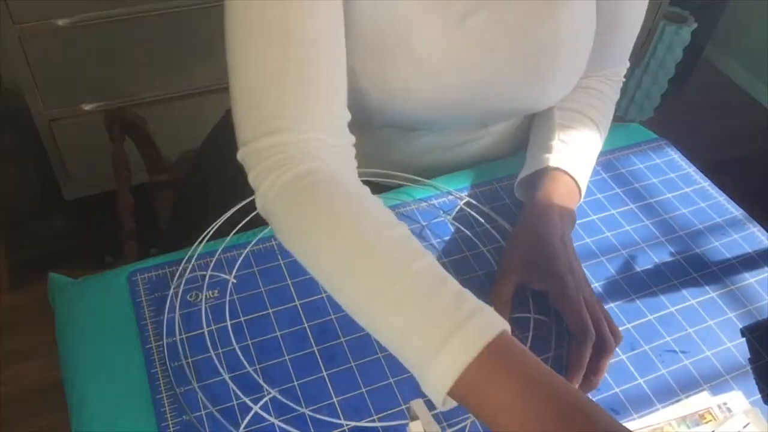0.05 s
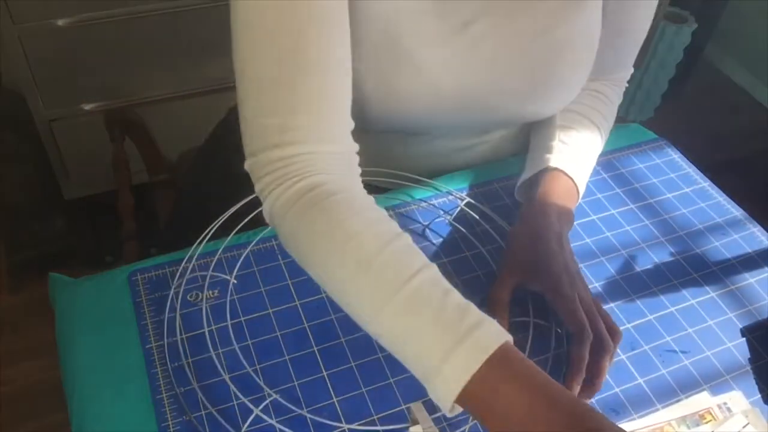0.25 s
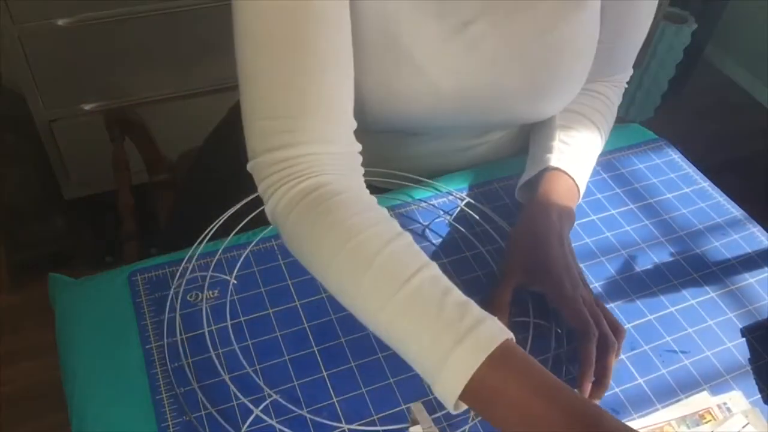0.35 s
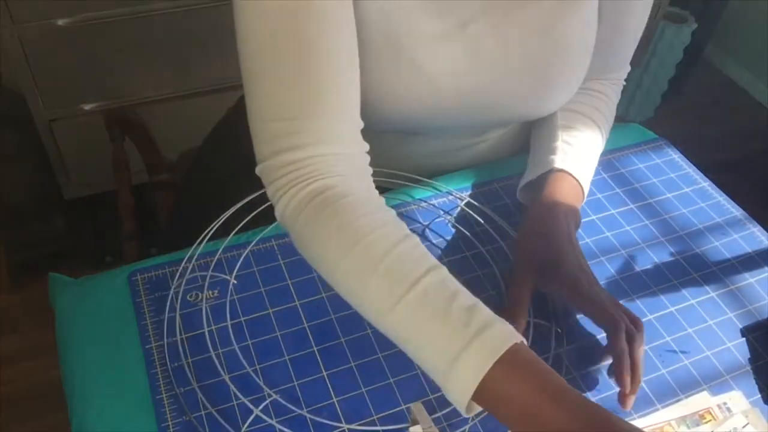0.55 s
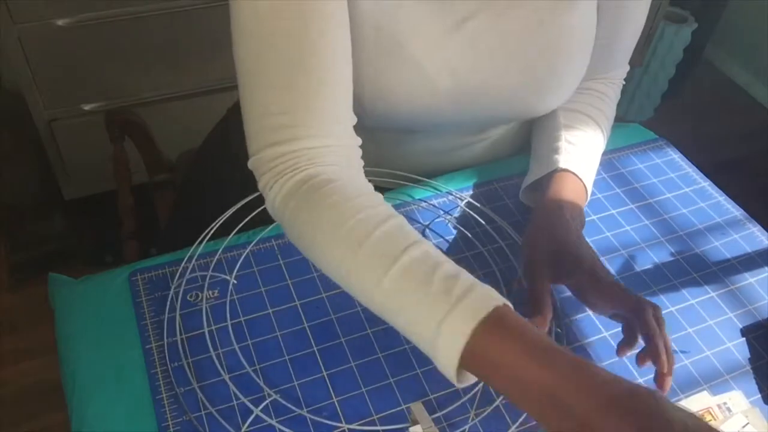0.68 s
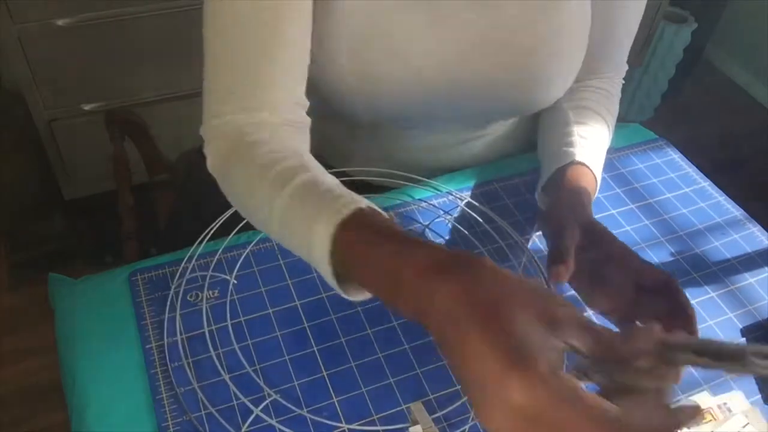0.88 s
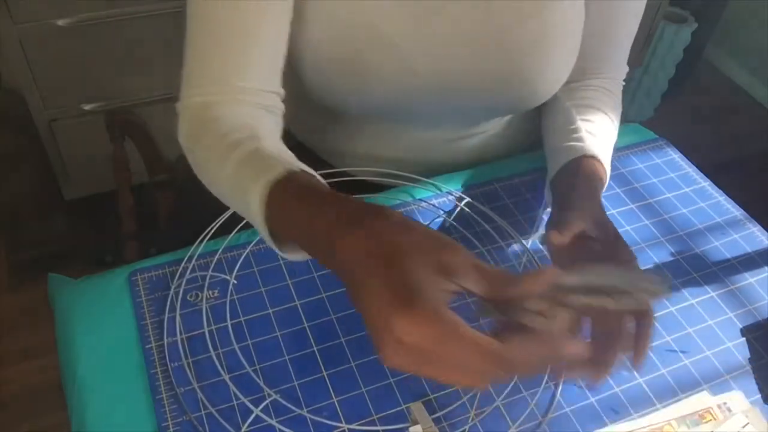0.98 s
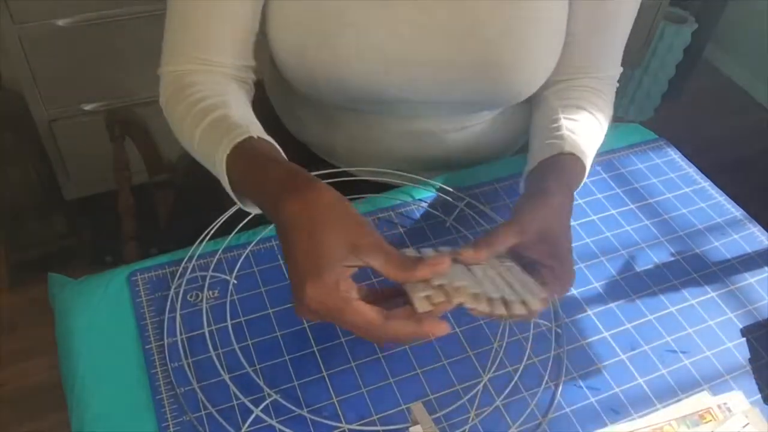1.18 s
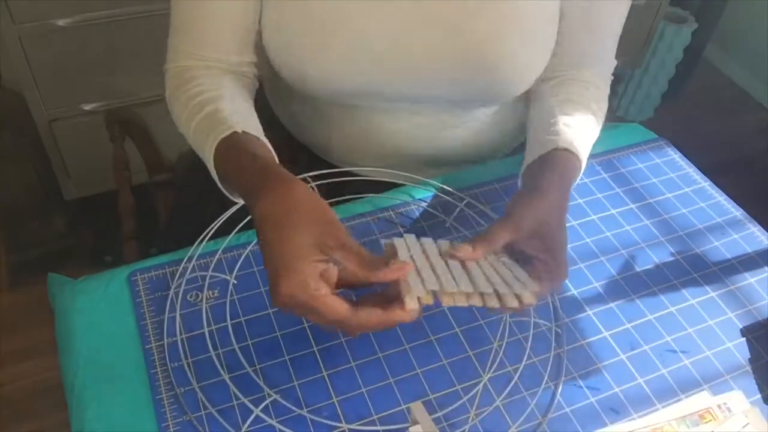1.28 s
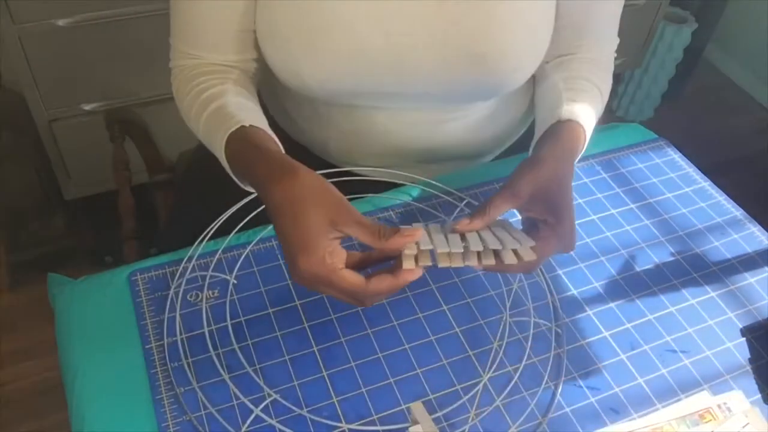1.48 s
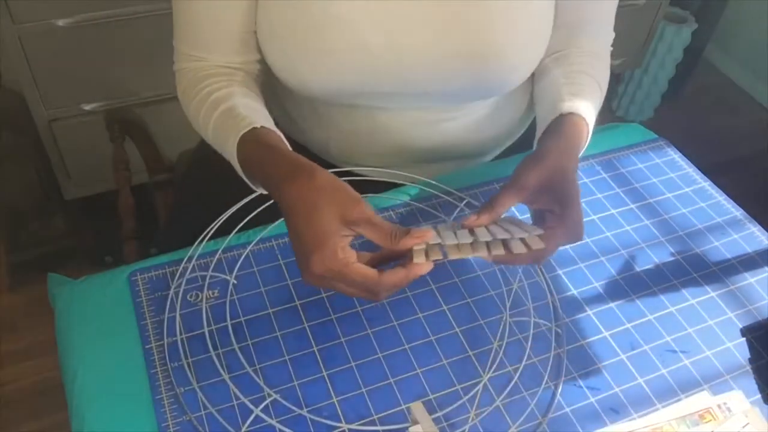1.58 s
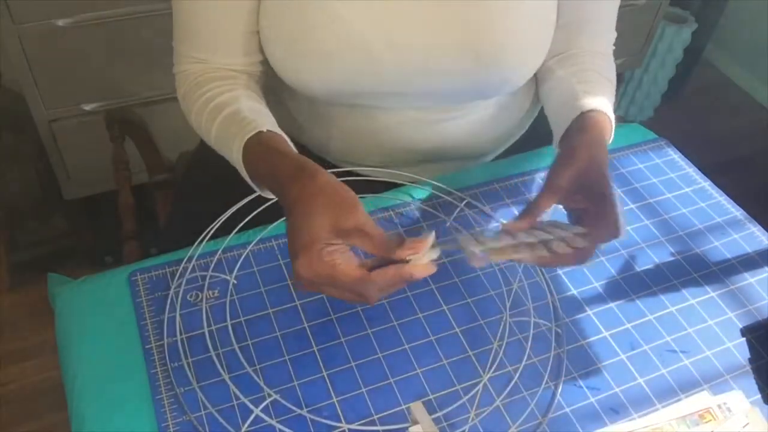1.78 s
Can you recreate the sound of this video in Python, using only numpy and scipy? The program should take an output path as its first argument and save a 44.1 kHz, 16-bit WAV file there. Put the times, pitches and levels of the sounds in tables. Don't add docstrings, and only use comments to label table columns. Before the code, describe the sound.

Small craft piece of wooden slats knocks down sharply on a table, followed by quiet clicks and rustles

```python
import sys
import numpy as np
from scipy import signal
from scipy.fft import rfft, irfft
from scipy.io import wavfile
from scipy.ndimage import uniform_filter1d

SR = 44100
rng = np.random.default_rng(int(sys.argv[2]) if len(sys.argv) > 2 else 0)


def nominal_scale(level):
    x = np.asarray(level, float) / 20
    return 10 ** x


def store_wav(level_fs):
    pcm = np.round(np.clip(np.atleast_2d(level_fs), -1, 1) * 32767)
    wavfile.write(sys.argv[1], SR, pcm.T.astype(np.int16))


N = 81585
RISE_S = 0.000081


def evened(x):
    return x / np.sqrt(np.mean(x ** 2) + 1e-20)


def read(points, hz):
    f, value = np.transpose(points)
    return np.interp(np.log(hz + 1), np.log(f + 1), value)


def add(mix, s, sound):
    at = round(s * SR)
    sound = sound[max(-at, 0):]
    part = mix[max(at, 0):][:len(sound)]
    part += sound[:len(part)]


def hump(length_s, place=0.42):
    u = np.linspace(0, 1, max(round(length_s * SR), 4))
    bend = np.log(.5) / np.log(np.clip(place, .05, .95))
    return np.sin(np.pi * u ** bend) ** 2


def ring(hz, width_hz, size=1500):
    t = np.arange(size) / SR
    decay = np.exp(-np.pi * abs(width_hz) * t)
    return (1 - np.exp(-t / RISE_S)) * decay * np.sin(2 * np.pi * hz * t)


def crack(hz, decay_s):
    t = np.arange(1500) / SR
    octaves = np.array([-0.79, 0.79])
    band = np.clip(hz * 2 ** octaves, 100, SR / 2.5) / (SR / 2)
    b, a = signal.butter(2, band, "band")
    splinters = evened(signal.lfilter(b, a, rng.standard_normal(len(t))))
    return splinters * (1 - np.exp(-t / RISE_S)) * np.exp(-t / decay_s) / 2


def hits(rows, decay_s):
    out = np.zeros(N)
    for s, db, hz, width_hz, crack_db in rows:
        contact = ring(hz, width_hz) + nominal_scale(crack_db) * crack(hz, decay_s)
        add(out, s, nominal_scale(db) * contact)
    return out


def coloured(spectrum, patchy_db):
    frames, hz = N // 128 + 5, np.fft.rfftfreq(512, 1 / SR)
    a, b, patches = rng.standard_normal((frames, 257, 3)).T
    patches = uniform_filter1d(patches, size=6, axis=0)
    patches = evened(uniform_filter1d(patches, size=14, axis=1))
    level = nominal_scale(read(spectrum, hz)[:, None] + patchy_db * patches)
    z = (a + 1j * b) * level * (hz[:, None] > 0)
    return evened(signal.istft(z, nperseg=512, noverlap=384)[1][:N])


def air():
    # (frequency [Hz], density [dB per Hz])
    tone = [(22, -25), (50, -5.5), (150, -3), (220, -8.5), (320, -7), (900, -14), (6300, -21.5),
            (15800, -30)]
    level_db, lump_db, bass_below_hz = -69, 3, 400
    hz = np.fft.rfftfreq(N, 1 / SR)
    lumps = nominal_scale(lump_db * evened(uniform_filter1d(rng.standard_normal(N), size=1500)))
    noise = rfft(rng.standard_normal(N)) * nominal_scale(read(tone, hz))
    bass = 1 / (1 + (hz / bass_below_hz) ** 4)
    hum = irfft(noise * bass, N) * evened(lumps)
    hiss = irfft(noise * (1 - bass), N)
    return nominal_scale(level_db) * evened(hum + hiss)


def rustles():
    # (start [s], length [s], level [dB], brightness [dB per octave])
    strokes = [(-.03, 0.093, -64, -0.5), (-.02, 0.49, -74.5, -2.5), (0.468, 0.1, -68.5, 1.5),
               (1.0, 0.15, -65.5, 0.3), (1.245, 0.11, -73.5, 4), (0.93, 0.045, -83, 4.5),
               (1.08, 0.67, -71.5, -0.5), (1.775, 0.037, -72, 4), (.59, 0.086, -64.5, 0),
               (.7, 0.13, -62, 0.6), (1.82, 0.12, -67, 3), (-0.007, 0.19, -71.5, -1),
               (.41, 0.048, -67, -3.5), (.195, 0.062, -47.5, 0.5)]
    # (frequency [Hz], density [dB per Hz])
    cloth = [(100, 3.5), (350, -4.5), (700, -9), (1400, -7.5), (2600, -5.5), (7000, -16), (11000, -21),
             (15500, -25)]
    out, hiss = np.zeros(N), coloured(cloth, patchy_db=0.5)
    hz = np.fft.rfftfreq(N, 1 / SR)
    for k, (s, length_s, db, tilt_db) in enumerate(strokes):
        tilted = irfft(rfft(hiss) * nominal_scale(tilt_db * np.log2(hz / 2000 + 0.14)), N)
        fresh = np.roll(tilted, -k * N // len(strokes))
        level = nominal_scale(db) * hump(length_s, place=.33)
        add(out, s, level * fresh[:len(level)])
    return out


def scrapes():
    # (start [s], length [s], level [dB], body number)
    strokes = [
        (.143, 0.017, -57, 2),
        (.159, .012, -55, 2),
        (0.163, 0.084, -52.5, 1),
        (0.534, 0.061, -59.5, 1),
        (0.593, 0.038, -59.5, 1),
        (0.714, 0.044, -54.5, 0),
        (0.756, 0.027, -66, 0),
        (1.803, 0.1, -64.5, 3),
        (0.676, 0.032, -68, 1),
    ]
    # (frequency [Hz], width [Hz], level [dB])
    bodies = [
        [(1750, 62, -13), (2000, 47, -2), (3240, 87, -1), (5200, 44, -15), (6480, 65, -13), (7170, 98, -14),
         (9290, 60, -24)],
        [(1712, 55, 3), (2770, 115, -1), (3430, 36, -10.5), (5060, 65, -12), (7460, 33, -22)],
        [(3130, 330, 16), (6350, 340, 12.5), (8650, 143, 7), (10300, 120, 9)],
        [(1450, 95, -5), (2280, 280, -3), (4420, 200, -6), (11600, 180, -3)],
    ]
    slips_per_s, spread_db, widen = 3100, 3.5, 2.8
    out, drag = np.zeros((2, N))
    for s, length_s, db, body in strokes:
        chance = rng.random((6000, 3))
        slipping = chance[:, 0] < slips_per_s / SR
        strength = nominal_scale(-spread_db * np.log(chance[:, 1] + 0.034))
        slips = slipping * strength * np.sign(chance[:, 2] - .5)
        stroke = np.sqrt(hump(length_s, place=0.54))
        slips = nominal_scale(db) * evened(slips)[:len(stroke)] * stroke
        modes = sum(nominal_scale(d) * ring(hz, widen * w) * np.sqrt(w) for hz, w, d in bodies[int(round(body))])
        add(out, s, np.convolve(slips, modes / np.linalg.norm(modes)))
        add(drag, s, slips)
    return out, drag


def slat_taps():
    # (time [s], peak [dB], ring [Hz], ring width [Hz], crack [dB])
    taps = [(0.4817, -55, 4170, 1490, 5), (0.598, -55, 1210, 200, 1), (.6045, -44, 2780, 350, -19),
            (.6118, -45, 1890, 300, -27), (0.6134, -41, 3000, 350, -13), (.616, -36, 9800, 1180, -19),
            (.624, -49, 3000, 338, -4), (0.7541, -38, 1750, 113, -40), (.7535, -42, 3400, 250, -12),
            (.7545, -58, 8000, 1500, 2), (.7275, -45, 3160, 300, -16), (.7405, -45, 2030, 250, -15),
            (.83, -51, 7060, 900, -5.5), (1.7592, -51, 13200, 900, -17), (1.7595, -54, 8750, 890, -12),
            (1.779, -56.5, 2450, 200, -8), (1.84, -54, 4450, 300, 1), (1.8492, -45, 1620, 600, -18)]
    # (time [s], peak [dB], ring [Hz], ring width [Hz])
    more_taps = [(.0005, -51, 2200, 200), (.0042, -52, 1700, 199), (.0048, -52.5, 2410, 200),
                 (.0145, -53, 1360, 148), (.026, -59, 3400, 200), (.546, -55, 1700, 150),
                 (.5475, -55, 3000, 200), (.5525, -52, 1780, 120), (.5585, -56, 2900, 200),
                 (.569, -55, 2950, 200), (.5735, -56, 2800, 200), (.6118, -51, 4400, 300),
                 (.6145, -47, 1710, 150), (.641, -55.5, 1810, 150), (.689, -53.5, 3100, 250),
                 (.7225, -54, 3300, 150), (.7282, -52, 2070, 250), (.7355, -51, 3250, 200),
                 (.7405, -48, 3070, 200), (.7452, -45, 2980, 200), (.7468, -47, 2000, 150),
                 (.7535, -50, 5200, 250), (.738, -58, 9350, 50), (1.2582, -61, 3550, 300),
                 (1.279, -66, 5400, 30), (1.271, -63, 8200, 300), (1.374, -69, 11800, 60),
                 (1.7788, -59, 1850, 200), (1.7785, -61, 3520, 250)]
    cracked_more_taps = [(*row, -10) for row in more_taps]
    return hits([*taps, *cracked_more_taps], decay_s=0.0025)


def table(drag):
    # (time [s], level [dB], push length [s], push pitch [Hz])
    thumps = [(0.0, -58, .008, 130), (.15, -50.5, .035, 150), (.19, -45.5, 0.0067, 150),
              (0.2193, -34, .0012, 800), (.2200, -33, 0.0065, 400), (.223, -35, 0.014, 105),
              (.243, -38.5, 0.014, 160), (.27, -48, 0.018, 155), (.295, -47, 0.029, 143),
              (0.341, -60, .02, 129), (0.344, -56, 0.055, 60.8), (.408, -55.5, 0.029, 148),
              (.515, -66, .02, 280), (.536, -53, 0.053, 142.5), (.563, -59.5, 0.026, 739),
              (.572, -59, .012, 300), (0.603, -61.5, 0.018, 105), (.66, -67, 0.027, 153),
              (.743, -63, .012, 730), (.745, -60, 0.01, 430), (0.752, -57, 0.036, 149),
              (.757, -58, .012, 300), (.728, -62, .015, 500), (1.035, -66, .04, 330),
              (1.235, -68, .03, 320)]
    # (frequency [Hz], level [dB], t60 [s])
    top_modes = [(62.4, -29, 0.16), (104, -16, 0.078), (154, -13, 0.061), (177, -19, 0.061),
                 (303, -3, 0.067), (405, 1, 0.054), (500, -8, 0.047), (722, -1.5, 0.079), (980, -5, 0.059)]
    rumble_db, direct_push = -9.5, 0.22
    top = sum(nominal_scale(db) * ring(hz, 3.16 / t60, size=14000) / t60 for hz, db, t60 in top_modes)
    out = nominal_scale(rumble_db) * signal.fftconvolve(drag, top / np.linalg.norm(top))[:N]
    for s, db, length_s, hz in thumps:
        press = hump(length_s)
        push = press * np.sin(2 * np.pi * hz * np.arange(len(press)) / SR)
        thud = signal.fftconvolve(push, top)
        add(out, s, nominal_scale(db) * thud / abs(thud).max())
        add(out, s, nominal_scale(db) * direct_push * push)
    return out


def rattle():
    # (frequency [Hz], density [dB per Hz])
    parts = [(300, 0), (800, 2.5), (2200, -1.5), (3000, -7.5), (5500, -8), (9500, -14), (11000, -13.5),
             (15500, -28)]
    level_db, t60_s, bumps_per_s, bed = -44.5, 0.3, 700, 1.6
    t = np.arange(SR // 4) / SR
    bumps = (rng.random(len(t)) < bumps_per_s / SR) * rng.exponential(1, len(t))
    chatter = evened(np.convolve(bumps, hump(.002))[:len(t)]) + bed
    return nominal_scale(level_db - 60 * t / t60_s) * chatter * coloured(parts, patchy_db=2.0)[:len(t)]


def clack():
    # (time [s], peak [dB], ring [Hz], ring width [Hz], crack [dB])
    knocks = [(.1462, -50, 9800, 300, -12), (.1505, -49, 10000, 300, -12), (.1525, -50, 3220, 300, -4),
              (.1535, -48, 6600, 250, -9), (.1555, -42.5, 2200, 400, 0), (.165, -46.5, 2900, 300, -7),
              (.1672, -40.5, 2510, 300, -4), (.1672, -39, 4400, 500, 5.5), (.1684, -38.5, 6400, 500, -2),
              (.198, -47, 3600, 1500, 5), (0.2072, -28.5, 1620, 450, -5), (.2205, -17, 2260, 340, -26),
              (.2285, -30, 8900, 500, -3), (.2245, -36, 1250, 300, -19), (.2595, -35.5, 3500, 200, -8),
              (.2612, -38, 1710, 300, -11), (0.2665, -31, 2180, 250, -10), (.2655, -39, 1260, 200, -23),
              (.2165, -24.5, 9500, 600, -17), (.335, -53, 2120, 25, -23), (.358, -54, 2070, 30, -19)]
    # (frequency [Hz], width [Hz], level [dB])
    edge_modes = [(1450, 770, -13), (3600, 570, -8.5), (5290, 450, -4), (6300, 780, -4.5),
                  (8300, 1400, -6.5), (9400, 970, -16), (12500, 1300, -23)]
    # (frequency [Hz], level [dB], t60 [s])
    board_modes = [(283.6, -6, 0.11), (404.5, -2, 0.073), (522, -1, 0.13), (684, -3.5, 0.12),
                   (836.5, -6, .16), (992, -3.5, 0.14), (1237, -8, .18), (1392, -11.5, 0.19),
                   (1488, -9.5, .18), (1701, -10.5, 0.16), (2100, -9.5, 0.36), (2320, -13, 0.17),
                   (2532, -12.5, .2)]
    crack_s = 0.0015
    out = hits(knocks, crack_s)
    edge_on = sum(nominal_scale(db) * ring(hz, width_hz) for hz, width_hz, db in edge_modes)
    add(out, .2150, nominal_scale(-10) * (edge_on + nominal_scale(-7) * crack(5350, crack_s)))
    board = sum(nominal_scale(db) * ring(hz, 2.43 / t60, size=9000) for hz, db, t60 in board_modes)
    add(out, .2200, nominal_scale(-36) * board)
    add(out, .219, rattle())
    return out


def room(x):
    # (frequency [Hz], t60 [s])
    decay = [(100, 0.42), (400, 0.19), (1100, 0.21), (2200, 0.3), (7700, 0.21), (13000, 0.23)]
    # (frequency [Hz], level [dB])
    colour = [(100, 8.5), (1300, -4), (2200, 2), (8000, -0.5), (15000, -1.5)]
    echoes = np.zeros(SR // 2 + 20)
    at = np.arange(120, SR // 2, 20)
    echoes[at + rng.integers(0, 20, len(at))] = rng.choice([-1., 1.], len(at))
    hz, t, z = signal.stft(echoes, SR, nperseg=256)
    fade_db = read(colour, hz)[:, None] - 60 * t / read(decay, hz)[:, None]
    tail = signal.istft(z * nominal_scale(fade_db), SR, nperseg=256)[1]
    return signal.fftconvolve(x, tail / np.linalg.norm(tail))[:N]


def scene():
    rubbed, drag = scrapes()
    loud = clack()
    small = slat_taps() + rubbed
    low = table(drag)
    wet = room(nominal_scale(-9) * loud + nominal_scale(-14) * small + nominal_scale(-13) * low)
    return (loud + small + low + wet + rustles() + air())[None]


def top_cut(x):
    return signal.sosfilt(signal.butter(12, 16660, fs=SR, output="sos"), x)


def record(dry):
    dip_hz, dip_width_hz, dip_db = 10460, 330, -6.5
    hz = np.fft.rfftfreq(N, 1 / SR)
    dip = nominal_scale(dip_db * np.exp(-((hz - dip_hz) / dip_width_hz) ** 2))
    dipped = irfft(rfft(dry) * dip, N)
    b, a = signal.butter(3, 45 / (SR / 2), "high")
    thinned = signal.lfilter(b, a, dipped)
    band_limit = signal.firwin(255, 15800, window=("kaiser", 9), fs=SR)
    return top_cut(signal.oaconvolve(thinned, band_limit[None], "same"))


dry = scene()
out = record(dry)
store_wav(out)
```